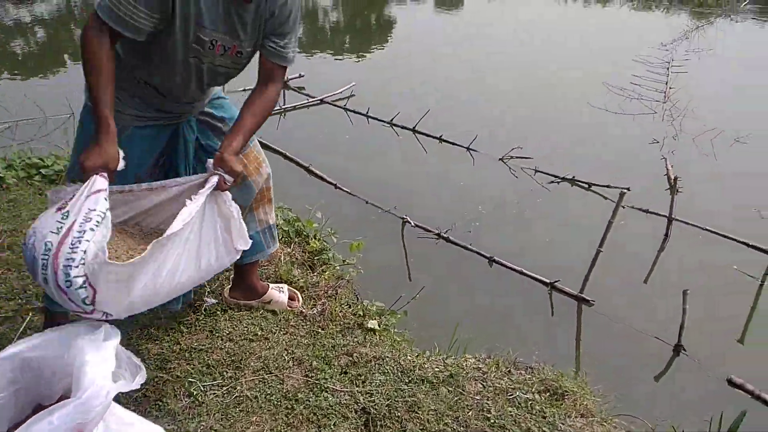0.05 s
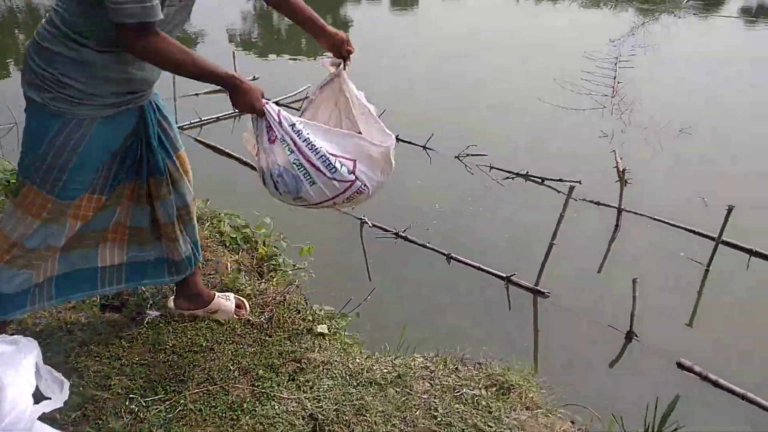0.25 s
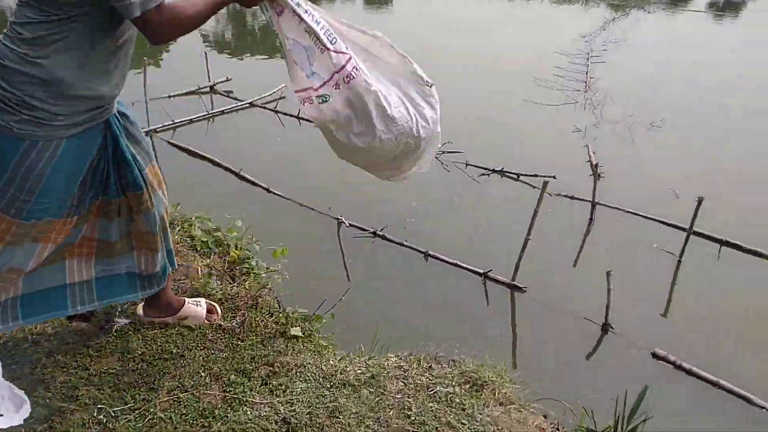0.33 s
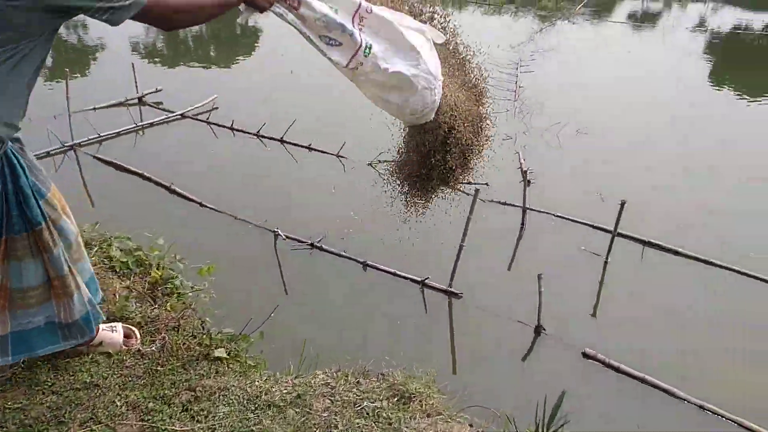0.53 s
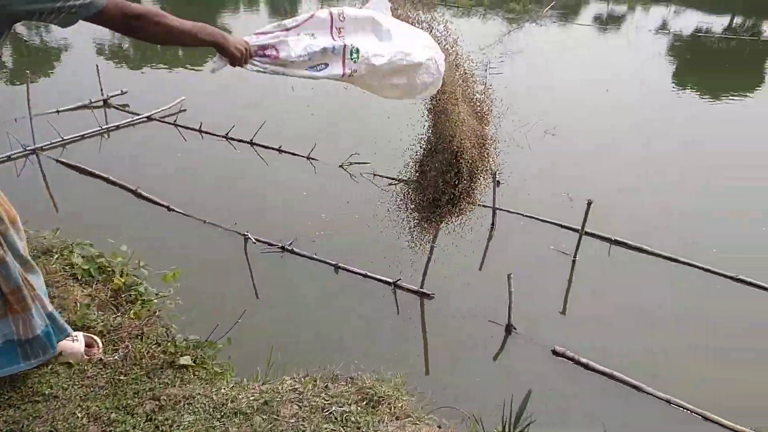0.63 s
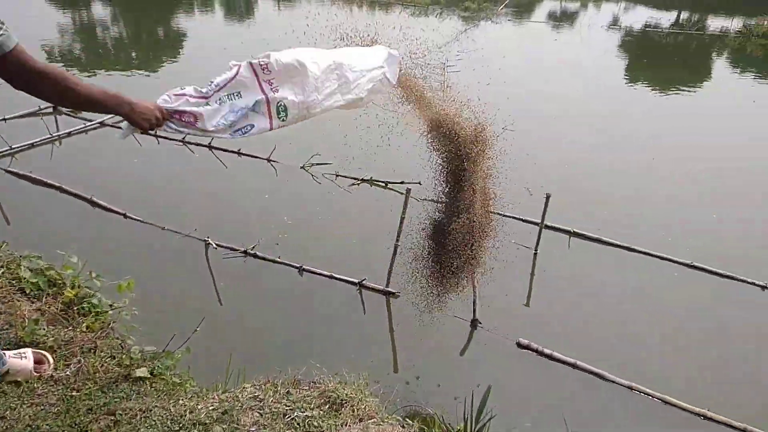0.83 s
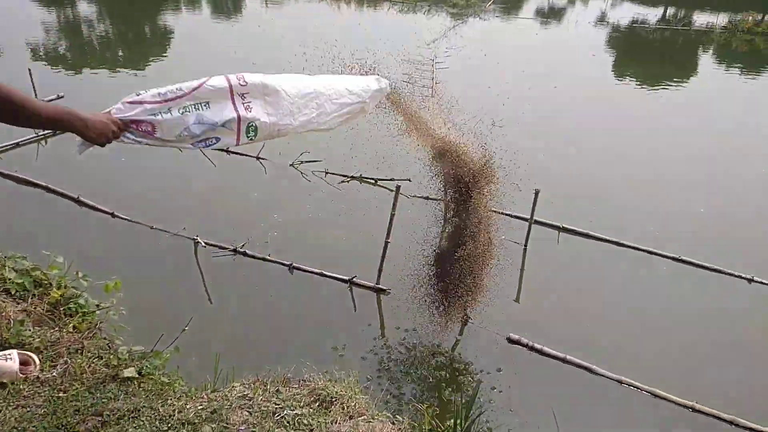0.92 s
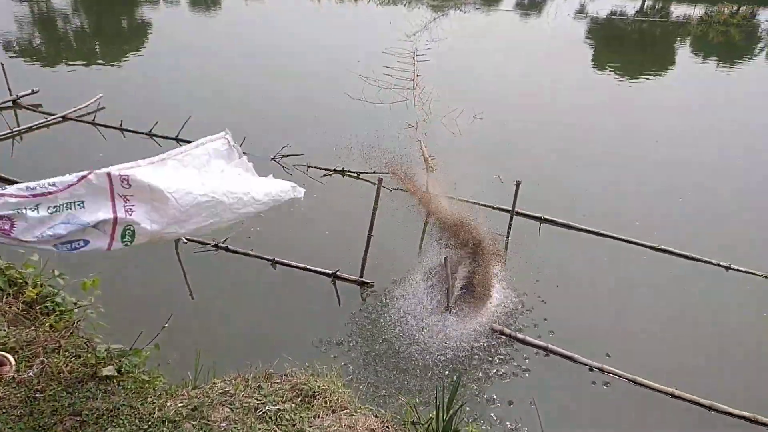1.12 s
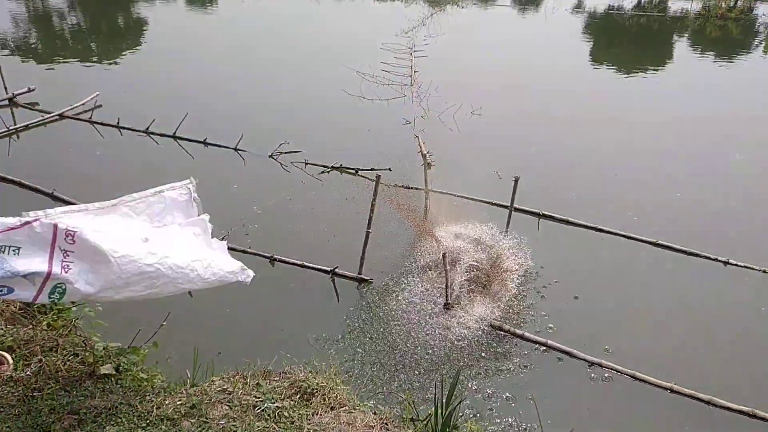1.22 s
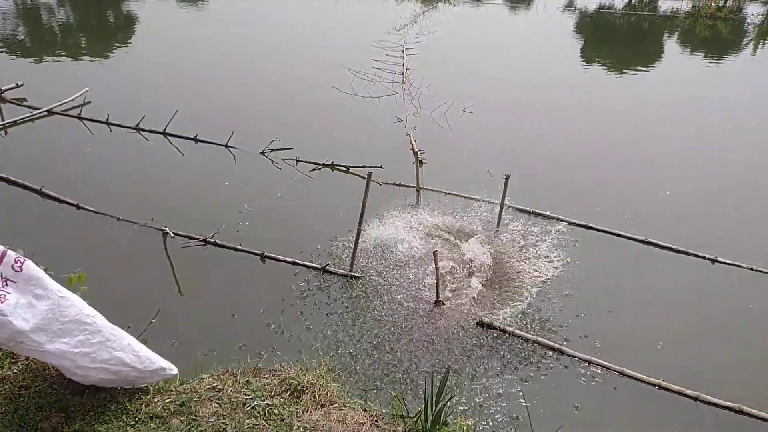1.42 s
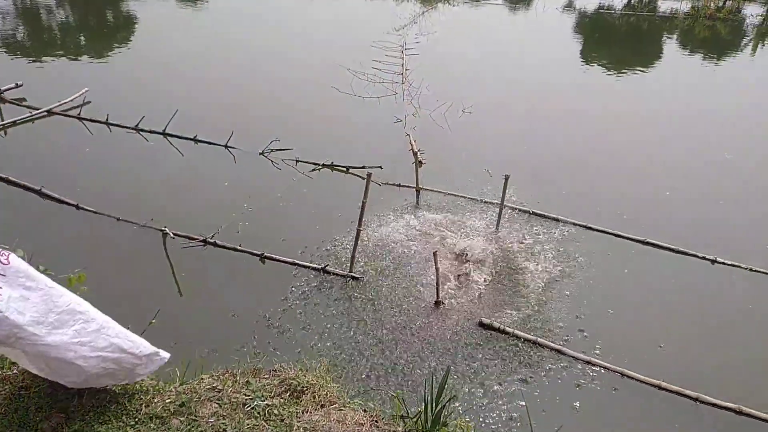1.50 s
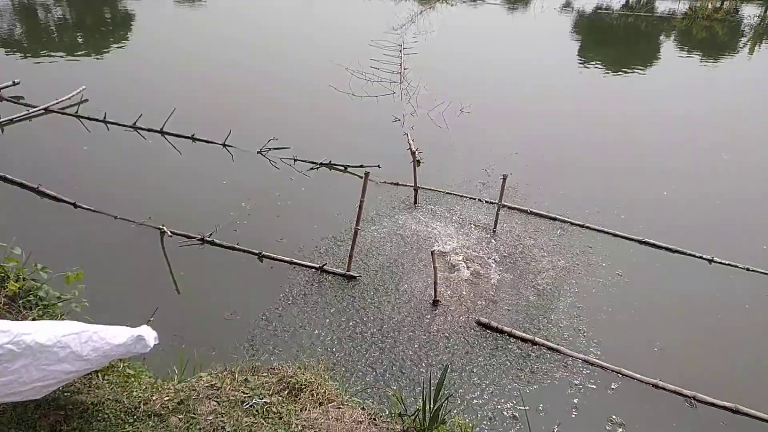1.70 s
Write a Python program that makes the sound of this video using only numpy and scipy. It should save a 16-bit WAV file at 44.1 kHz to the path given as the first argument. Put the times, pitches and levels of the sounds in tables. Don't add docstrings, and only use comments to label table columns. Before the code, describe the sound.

Close stereo sound on a grassy pond bank: a sack snaps taut, dry pellets swish out, cloth flaps softly, then countless tiny splashes hiss with low bubbles and thin out as the cloth drops.

```python
import sys
import numpy as np
from scipy import signal
from scipy.fft import rfft, irfft, next_fast_len
from scipy.io import wavfile
from scipy.ndimage import uniform_filter1d

SR = 44100
rng = np.random.default_rng(int(sys.argv[2]) if len(sys.argv) > 2 else 0)


def generate_wav(signal):
    frames = np.transpose(np.atleast_2d(signal))
    scaled = np.clip(frames, -1, 1) * 32767
    pcm = np.round(scaled).astype(np.int16)
    wavfile.write(sys.argv[1], SR, pcm)


def rack_gain(trim_db):
    fader = np.asarray(trim_db, float)
    return 10 ** (fader / 20)


N = 77175


def evened(x):
    return x / np.sqrt(np.mean(x ** 2) + 1e-20)


def read(points, hz):
    f, value = np.transpose(points)
    return np.interp(np.log(hz + 1), np.log(f + 1), value)


def grains(level, tone, cycles, glide, size_db, lag, scatter, count, order=28):
    s, db = np.transpose(level)
    when, kind, big, sign, way, wide = rng.random((count, 6)).T
    when = s[0] + (s[-1] - s[0]) * when
    size = rack_gain(-size_db * np.log(1 - big * .995)) * np.sign(sign - .5)
    density = count / ((s[-1] - s[0]) * SR)
    size = rack_gain(np.interp(when, s, db)) * evened(size) / np.sqrt(density)
    spread = (2 * way - 1) * -np.log(1 - wide)
    late = np.interp(when, *np.transpose(lag)) + np.interp(when, *np.transpose(scatter)) * spread

    pitch = np.geomspace(tone[0][0], tone[-1][0], order)
    energy = rack_gain(2 * read(tone, pitch)) * pitch
    first = max(int(s[0] * SR) - 1000, 0)
    end = int((s[-1] + 4 * cycles / pitch[0]) * SR) + 2000
    room = next_fast_len(end - first)
    out = 0
    for k, hz in enumerate(pitch):
        u = np.arange(0, 3 * cycles, hz / SR)
        shape = u * np.exp(-3 * u / cycles) * np.sin(2 * np.pi * u * (1 + glide * u / cycles))
        shape = shape - shape.mean()
        mine = (kind * order).astype(int) == k
        train = np.zeros((2, room))
        for side, at in enumerate((when * SR, when * SR + late)):
            place = np.clip(at[mine] - first, 0, room - 1).astype(int)
            train[side] = np.bincount(place, size[mine], room)
        gain = np.sqrt(energy[k] / energy.mean()) / np.linalg.norm(shape)
        out = out + rfft(train) * rfft(shape, room) * gain
    low = (np.fft.rfftfreq(room, 1 / SR) / pitch[0]) ** 4
    sound = irfft(out * low / (low + .2), room)
    return np.pad(sound, ((0, 0), (first, N)))[:, :N]


def sack():
    # start_s, level_db
    rush_level = [
        (0.17, -67),
        (0.176, -50),
        (0.292, -15),
        (0.336, -18.5),
        (0.38, -31.5),
        (0.462, -37.5),
        (0.49, -33.5),
        (0.552, -32.5),
        (0.6, -53),
    ]
    # pitch_hz, level_db
    rush_tone = [(200, -11), (500, -11), (1500, -3.5), (2500, -3.5), (4000, -2.5), (6000, -7.5), (9000, -1),
                 (15500, -14)]
    # start_s, level_db
    hollow_level = [(.24, -42.5), (.3, -22.5), (.325, -33), (.342, -25), (.38, -35), (.46, -45.5),
                    (.482, -33.5), (.51, -53), (.58, -56)]
    # pitch_hz, level_db
    hollow_tone = [(600, -2.5), (740, 9), (950, -2)]
    # start_s, level_db
    flap_level = [(0.58, -37), (0.588, -46), (0.65, -39.5), (0.686, -54), (0.698, -43), (0.796, -36),
                  (0.874, -60.5), (0.89, -39), (0.925, -53)]
    # start_s, level_db
    drop_level = [
        (1.4, -29),
        (1.52, -43),
        (1.59, -36.5),
        (1.66, -48),
        (1.75, -59),
    ]
    # pitch_hz, level_db
    cloth_tone = [(120, -5), (300, -16), (720, 1), (1400, -2.5), (3000, -1), (6000, -10), (9000, -5),
                  (15500, -14.5)]
    shade = 0.25

    rush = grains(rush_level, rush_tone, 3.8, 0.0062, 1.46, [(.3, 2.2), (.45, 2.4)],
                  [(.3, 5.6), (.45, 2.7)], count=30000)
    hollow = grains(hollow_level, hollow_tone, 5.1, -0.011, 1.5, [(0, 0.87)], [(0, 4.1)], count=600, order=5)
    flap = grains(flap_level, cloth_tone, 5.1, .01, 2.8, [(.6, -1), (.9, -5)],
                  [(.6, 6.3), (.9, 1.2)], count=7000)
    drop = grains(drop_level, cloth_tone, 2.0, 0.0077, 2.7, [(1.4, -2), (1.7, -1.6)],
                  [(1.4, 3.3), (1.7, 7.4)], count=6000)
    left, right = rack_gain(4.0) * rush + hollow + rack_gain(3.0) * flap + drop
    return np.array([left, (right + shade * np.roll(right, shift=2)) / (1 + shade)])


def pond():
    # start_s, level_db
    splash_level = [
        (.915, -42.5),
        (.953, -38.5),
        (.9635, -25.5),
        (.967, -23.5),
        (1.04, -17.5),
        (1.253, -19),
        (1.55, -38.5),
        (1.685, -44.5),
        (1.75, -41),
    ]
    # pitch_hz, level_db
    splash_tone = [(300, -21), (1300, -16), (2600, -2.5), (3600, -0.5), (5500, -4.5), (9000, 4.5),
                   (12000, -2.5), (15500, -3.5)]
    # start_s, late_at_right_samples
    lean = [(.95, -2.2), (1.1, -.3)]
    # start_s, scatter_samples
    widen = [(1.0, .75), (1.27, .85), (1.45, 5)]
    # start_s, level_db
    bubble_level = [(.98, -33), (1.03, -31.5), (1.2, -31), (1.32, -26.5), (1.43, -32.5), (1.53, -46),
                    (1.75, -40)]
    # pitch_hz, level_db
    bubble_tone = [(110, -16), (250, -13), (500, -12), (720, -2), (1100, -7.5), (2000, -6.5), (3500, -4.5)]
    # start_s, level_db
    fizz_level = [(0.0, -44.5), (0.056, -43.5), (0.066, -53), (0.16, -64), (0.2, -47)]
    # pitch_hz, level_db
    fizz_tone = [(500, -10), (2000, -14.5), (3500, -7), (6000, 0), (9000, -3), (15500, -11)]
    # pitch_hz, late_radians
    detour = [(0, 0), (2200, .9), (2600, 2.2), (3400, 2.85), (4300, 3.5), (5000, 5.9), (7000, 9.5),
              (16000, 18)]

    hits = grains(splash_level, splash_tone, 3.73, 0.016, 2.3, lean, widen, count=90000)
    bubbles = grains(bubble_level, bubble_tone, 4.3, 0.04, 1.2, [(1, 0.021)], [(1, 9.7)], count=2500, order=16)
    fizz = grains(fizz_level, fizz_tone, 1.8, 0.055, 1.6, [(0, 6.0)], [(0, 10.0)], count=4000, order=16)
    left, right = rack_gain(4.5) * hits + bubbles
    turn = np.exp(-1j * np.interp(np.fft.rfftfreq(N, 1 / SR), *np.transpose(detour)))
    return np.array([left, irfft(rfft(right) * turn, N)]) + rack_gain(8.0) * fizz


def snaps():
    # start_s, peak_db, ring_cycles
    snap_events = [
        (.012, -36, 2.3),
        (0.126, -32, 3.5),
        (.2107, -23, 1.6),
        (0.2496, -10, 0.87),
        (0.556, -26, 1.2),
        (0.6164, -27, 1.5),
        (0.8, -26.5, 3),
    ]
    # pitch_hz, level_db
    snap_tone = [(600, -11), (1500, -8), (2700, 7.5), (5000, 3.5), (8000, 8.5), (15500, -17)]
    out = 0
    for s, db, cycles in snap_events:
        burst = [(s, db), (s + .0003, db - 3)]
        out = out + grains(burst, snap_tone, cycles, .01, 1.5, [(0, 0)], [(0, .4)], count=10, order=8)
    return out


def belly():
    # start_s, level_db
    belly_level = [(.19, -60), (.235, -35), (.29, -32.5), (.36, -46), (.6, -50), (.64, -43.5), (.72, -87),
                   (.78, -40), (.84, -67)]
    # pitch_hz, level_db
    belly_tone = [(70, -12.5), (150, 2), (260, 3), (500, -8), (800, -2.5), (1200, -14.5)]
    return grains(belly_level, belly_tone, 2.5, 0.013, 6.4, [(0, 2.0)], [(0, 5.1)], count=900, order=10)


def breeze():
    # start_s, level_db
    breeze_level = [(0, -79), (.18, -73), (.24, -52), (.4, -51), (.9, -61.5), (1.1, -53), (1.36, -52),
                    (1.55, -57), (1.75, -61)]
    # pitch_hz, level_db
    breeze_tone = [(22, 9), (50, 4), (110, -21)]
    return grains(breeze_level, breeze_tone, 1.04, .01, 2.9, [(0, 0.026)], [(0, 86)], count=300, order=5)


def air():
    # pitch_hz, level_db
    air_tone = [(12, -32), (20, -4.5), (357, -8.5), (780, -7), (1760, -13.5), (2600, -9.5), (5530, -12.5),
                (8650, -13), (16000, -16)]
    # pitch_hz, correlation
    air_same = [(25, 0.21), (130, 1), (900, 0.85), (3000, 0.067), (15000, 0.054)]
    level_db = -43
    frames, hz = N // 256 + 5, np.fft.rfftfreq(1024, 1 / SR)
    a, b, c, d, patch = rng.standard_normal((frames, 513, 5)).T
    patch = uniform_filter1d(patch, size=12, axis=0)
    patch = evened(uniform_filter1d(patch, size=10, axis=1))
    same = np.clip(read(air_same, hz), -1, 1)[:, None]
    left = a + 1j * b
    right = same * left + np.sqrt(1 - same ** 2) * (c + 1j * d)
    z = np.array([left, right]) * rack_gain(read(air_tone, hz)[:, None] + 2.2 * patch)
    hush = signal.istft(z, nperseg=1024, noverlap=768)[1][:, :N]
    return rack_gain(level_db) * evened(hush)


def scene():
    return sack() + belly() + snaps() + pond() + air() + breeze()


def roll_off(x):
    return signal.sosfilt(signal.butter(12, 16000, fs=SR, output="sos"), x)


def record(dry):
    # pitch_hz, level_db
    right_port = [(300, 0), (2000, -1.5), (3500, .8), (4500, 3), (5700, -.2), (7000, 2.6), (11500, -1.5),
                  (15500, -10)]
    cavity_hz, cavity_width_hz, cavity_db = 2650, 650, 8
    ceiling, edge_hz = .85, 15950
    size = 4096
    hz = abs(np.fft.fftfreq(size, 1 / SR))
    db = read(right_port, hz) + cavity_db / (1 + (2 * (hz - cavity_hz) / cavity_width_hz) ** 2)
    response = np.exp(np.conj(signal.hilbert(np.log(rack_gain(db)))))
    taps = np.fft.ifft(response).real[:size // 4]
    ports = np.array([dry[0], signal.oaconvolve(dry[1], taps)[:N]])
    ports = ceiling * np.tanh(ports / ceiling)
    lowpass = signal.firwin(511, edge_hz, window=("kaiser", 9), fs=SR)
    ports = signal.oaconvolve(ports, lowpass[None], "same")
    return roll_off(ports)


dry = scene()
out = record(dry)
generate_wav(out)
```